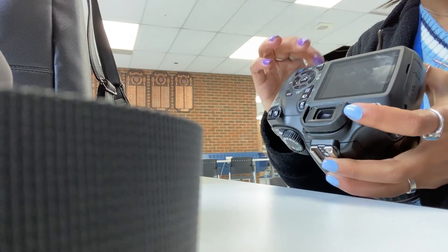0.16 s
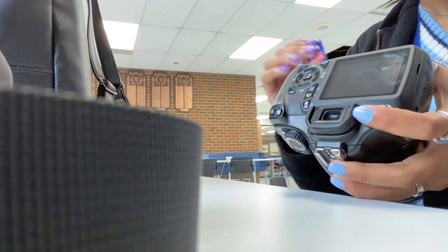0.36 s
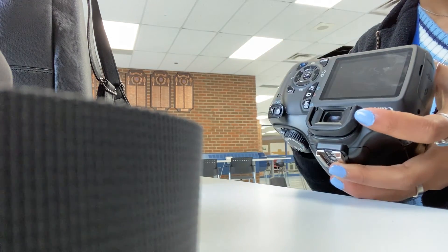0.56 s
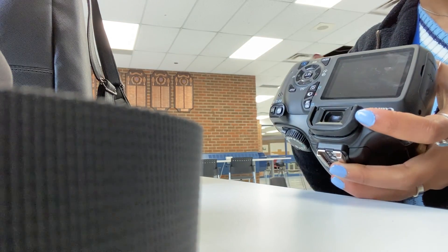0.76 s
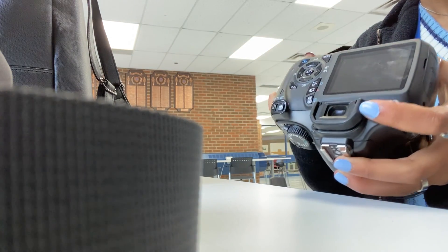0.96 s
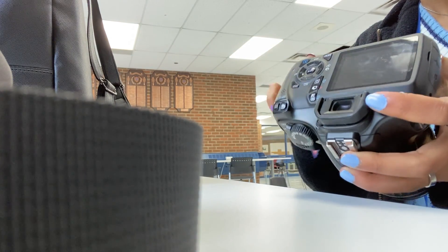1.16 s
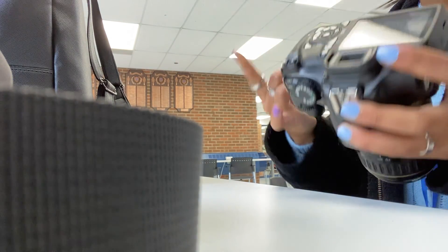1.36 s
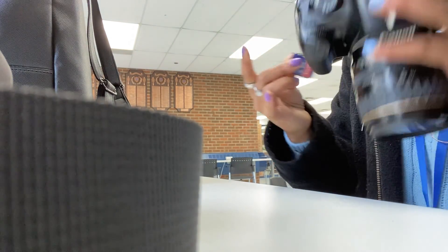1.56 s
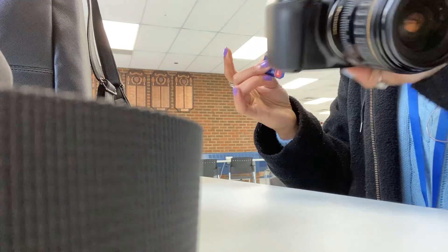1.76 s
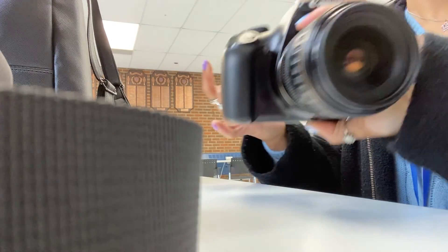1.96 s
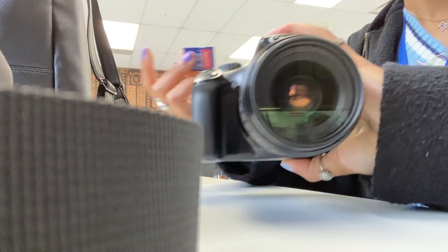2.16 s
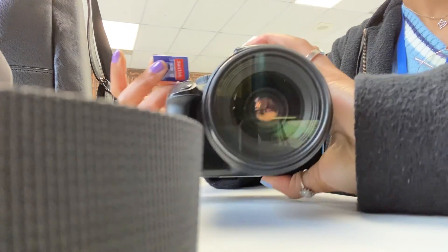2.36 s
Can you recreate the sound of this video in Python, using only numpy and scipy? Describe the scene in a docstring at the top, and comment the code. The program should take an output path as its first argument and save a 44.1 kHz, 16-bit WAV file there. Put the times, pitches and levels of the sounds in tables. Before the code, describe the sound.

Camera handling clicks: fingernail ticks and a short scrape, a button pressed and released, a cover snapped shut, then knocks and sleeve rustle as it is turned, close stereo microphone in a large humming room.

```python
"""A steady air-handling rumble fills a large room; fingernail ticks and a short scrape come over it.
Fingers at a table press a button of a plastic camera body, let it up, and snap a cover shut.
Then the camera is turned round, with knocks soft or sharp, a brush of sleeve and one dry tap.
Contacts excite decaying modes or noise bursts, rubbing is a train of random slips, the rumble is
filtered noise with tones, and decaying diffuse noise supplies the echoes of table and room."""
import sys
import numpy as np
from scipy import signal
from scipy.fft import rfft, irfft
from scipy.io import wavfile

SR = 44100
rng = np.random.default_rng(int(sys.argv[2]) if len(sys.argv) > 2 else 0)


def digitize_waveform(pressure):
    """Quantize a signal to 16-bit integers and store it at the path in sys.argv[1].

    Rows of a 2-D input are taken as channels; values are limited to [-1, 1].
    """
    field = np.atleast_2d(pressure).T
    bounded = np.clip(field, -1, 1)
    quanta = np.round(bounded * 32767).astype(np.int16)
    wavfile.write(sys.argv[1], SR, quanta)


N = 106942
T, HZ = np.arange(N) / SR, np.fft.rfftfreq(N, 1 / SR)  # time in s, frequency of each bin in Hz


def amp(db):
    """Level to gain: 20 dB is a factor of ten in amplitude."""
    return 10 ** (np.asarray(db) / 20)


def unit(x):
    """Normalisation to a root-mean-square of one."""
    return x / np.sqrt(np.mean(x ** 2) + 1e-20)


def decay(t, t60):
    """Exponential damping: the amplitude falls 60 dB in t60 seconds."""
    return np.exp(-np.log(1000) * t / t60)


def read(points, hz=HZ):
    """Interpolation of a spectrum along a logarithmic frequency axis."""
    f, value = np.transpose(points)
    return np.interp(np.log(hz + 1), np.log(f + 1), value)


def envelope(points):
    """Amplitude envelope: the level moves in straight lines in dB over time."""
    return amp(np.interp(T, *np.transpose(points), left=-120, right=-120))


def add(mix, s, sound):
    """Superposition: adds a sound to the mix at a time in seconds."""
    part = mix[round(s * SR):][:len(sound)]
    part += sound[:len(part)]


def colour(x, db):
    """Minimum-phase filtering: the Hilbert transform of log gain gives a causal phase."""
    log_gain = np.log(amp(np.maximum(db, -100)))
    mirrored = np.r_[log_gain, log_gain[-2:0:-1]]
    response = np.exp(signal.hilbert(mirrored).conj())
    return irfft(rfft(x) * response[:len(HZ)], N)


def burst(s, db, t60):
    """Random impulse excitation: a dying flurry of tiny contacts of either sign."""
    out, t = np.zeros(N), T[:SR // 10]
    signs = rng.choice([-1., 1.], len(t))
    add(out, s, signs * amp(db) * decay(t, t60))
    return out


def ring(contacts, modes):
    """Modal synthesis with dispersion: damped sines, the fast high bending waves arriving first."""
    longest_ring_s = .022  # the gripping hand damps the shell
    spread_s = 0.000712  # travel time of bending waves at 1 kHz
    out = np.zeros(N)
    for s, level in contacts:
        for k, (hz, db, t60) in enumerate(modes):
            travel = spread_s * np.sqrt(1000 / hz)
            sample_offset = round(s * SR) / SR - s  # keeps timing finer than a sample
            t = np.maximum(T[:SR // 10] + sample_offset - travel, 0)
            wave = decay(t, min(t60, longest_ring_s)) * np.sin(2 * np.pi * hz * t)
            add(out, s, (-1) ** k * amp(level + db) * wave)
    return out


def rub(level, shape, grain_db, grains_per_s):
    """Stick-slip friction: many small slips of uneven size at random times."""
    size = amp(grain_db * np.minimum(rng.exponential(1, N), 4))
    happens = rng.random(N) < grains_per_s / SR
    slips = rng.standard_normal(N) * size * happens
    return unit(colour(slips, shape)) * envelope(level)


# Left-right likeness of diffuse sound. Each row: frequency in Hz, coherence from 0 to 1.
LIKENESS = [(30, .99), (50, .94), (75, .6), (170, .5), (350, .4), (550, 0), (1500, .1), (5000, .2),
            (9000, .85), (14000, .95)]


def diffuse():
    """Spatial coherence: noise from all directions, as two close microphones get it."""
    a, b = rfft(rng.standard_normal((2, N)))
    same = np.clip(read(LIKENESS), -1, 1)
    return irfft(np.array([a, same * a + np.sqrt(1 - same ** 2) * b]), N)


# Spectrum of the moving air. Each row: frequency in Hz, relative density in dB per Hz.
AIR_COLOUR = [(20, -29), (31, -24), (44, -3), (66, -2), (92, -11), (125, -6), (190, -7), (300, -15),
              (540, -18), (680, -25), (820, -32), (1600, -46), (2500, -53), (3800, -62), (8000, -61),
              (12500, -61.5), (15000, -76)]
# Wavering fan tones. Each row: frequency in Hz, level in dB.
FAN_TONES = [(48.4, -50), (533, -68), (653, -74.5)]
# Swell and fade of the motor tone. Each row: time in seconds, level in dB.
MOTOR_LEVEL = [(0.1, -58), (0.42, -48), (0.85, -58), (1.1, -55), (2.05, -58.5), (2.28, -46.5)]


def ventilation():
    """Broadband flow noise plus periodic tones: air, wavering fans and a motor that comes and goes."""
    waver, waver_hz, motor_hz = 0.35, 4, 109.6  # waver: relative amplitude, and radians of phase
    sound = amp(-44) * unit(colour(diffuse(), read(AIR_COLOUR)))
    for hz, db in FAN_TONES:
        slow = np.exp(-(HZ / waver_hz) ** 2)
        swell, drift = unit(irfft(rfft(rng.standard_normal((2, N))) * slow, N))
        tone = (1 + waver * swell) * np.sin(2 * np.pi * hz * T + waver * drift)
        sound = sound + amp(db) * unit(tone)
    motor_level = amp(np.interp(T, *np.transpose(MOTOR_LEVEL)))
    return sound + motor_level * unit(np.sin(2 * np.pi * motor_hz * T))


# Fingernail ticks. Each row: start in seconds, level before colouring in dB, t60 in seconds.
NAIL_TICKS = [(0.0391, -22, 0.01), (0.0464, -26.5, 0.025), (0.1825, -14.5, 0.012), (0.187, -15.5, 0.012),
              (0.2012, -30, .008), (0.209, -25.5, 0.011), (0.2208, -29, 0.004), (0.287, -33, 0.016),
              (0.2927, -26, 0.0039), (0.403, -43.5, 0.0087), (0.4565, -45, .005), (0.482, -42, 0.0058),
              (1.1995, -46, 0.021), (1.215, -31.5, 0.012), (1.222, -33.5, 0.012), (1.2773, -44, 0.017),
              (1.3304, -37, 0.019), (2.03, -38, 0.0093), (2.3635, -34, 0.0099)]
# Their spectrum. Each row: frequency in Hz, gain in dB.
NAIL_COLOUR = [(500, -10.5), (2500, -36), (6000, -28.5), (8500, -28.5), (11000, -18.5), (13000, -9.5),
               (15000, -15.5), (16500, -21)]


def nails():
    """Impact of a light hard body: thin, bright ticks of fingernails on the shell."""
    return colour(sum(burst(*tick) for tick in NAIL_TICKS), read(NAIL_COLOUR))


# Course of the scrape. Each row: time in seconds, level in dB before the resonance gain.
SCRAPE_LEVEL = [(0.11, -92), (0.131, -60), (0.145, -63), (0.16, -62.5), (0.178, -57), (0.195, -62),
                (0.218, -65.5), (0.245, -102)]
# Its resonances. Each row: centre in Hz, offset at which the gain is 6 dB down in Hz, level in dB.
SCRAPE_RESONANCES = [(840, 160, -3), (1786, 410, -5.5), (3130, 535, -3.5), (4300, 460, -5.5),
                     (6820, 3500, -5.5), (12900, 1800, -8)]


def scrape():
    """Friction driving resonance: a nail drags over the shell, each resonance with its own slips."""
    out = np.zeros(N)
    for hz, width, db in SCRAPE_RESONANCES:
        shape = -20 * np.log10(1 + ((HZ - hz) / width) ** 2)
        out += amp(db) * rub(SCRAPE_LEVEL, shape, grain_db=3.5, grains_per_s=850)
    return out


# Catches of the dragging nail. Each row: start in seconds, level in dB, pitch in Hz.
NAIL_CATCHES = [(0.131, -52, 4350), (0.153, -50, 4320), (0.1585, -48, 3120), (0.1657, -48, 1920),
                (0.182, -39.5, 1590), (0.202, -51.5, 6630)]


def catches():
    """Plucked resonance: the dragging nail catches and lets go, sounding one mode each time."""
    t60 = .011
    return sum(ring([(s, db)], [(hz, 0, t60)]) for s, db, hz in NAIL_CATCHES)


# Knocks of fingers, soft and low or sharp and high.
# Each row: start in seconds, level in dB, centre in Hz, half width in octaves.
FINGER_KNOCKS = [(0.182, -16.5, 1430, 0.55), (0.1868, -22, 4500, 1), (0.8926, -40.5, 3400, 0.1),
                 (1.196, -39, 3600, 0.54), (1.2017, -19, 1440, 0.38), (1.551, -35.5, 2620, 0.37),
                 (1.5804, -15.5, 1780, 0.48), (1.828, -49, 4220, 0.8), (2.1155, -36.5, 2580, 0.61),
                 (2.206, -30, 1740, 0.75), (2.3646, -35.5, 8000, 0.26), (2.373, -20.5, 1194, 0.62)]


def knocks():
    """Band-limited impact: a blow and faint rattle excite one band of shell."""
    rattle_db, rattle_t60, skirt_db = -31, .01, 44  # skirt in dB per octave outside the band
    out = np.zeros(N)
    for s, db, hz, octaves in FINGER_KNOCKS:
        blow = burst(s, db + rattle_db, rattle_t60)
        add(blow, s, amp([db]))
        outside = np.maximum(abs(np.log2((HZ + 1) / hz)) - octaves, 0)
        out += colour(blow, -skirt_db * np.minimum(outside, 2))
    return out


# Contacts within each click. Each row: start in seconds, relative level in dB.
PRESS_CONTACTS = [(0.5477, -0.5), (0.5483, -14.5)]
RELEASE_CONTACTS = [(0.6433, -3), (0.6442, -11.5), (0.6454, 5)]
SNAP_CONTACTS = [(0.956, -16), (0.9578, 0.5), (0.9587, -24.5)]
# Modes of each struck part. Each row: frequency in Hz, relative level in dB, t60 in seconds before
# the hand's damping limit.
PRESS_PART = [(819, -33.5, 0.017), (1085, -31, 0.014), (1660, -37, 0.022), (2000, -37, 0.0033),
              (3045, -24, 0.0049), (3460, -28.5, 0.005), (4150, -31, 0.0061), (6040, -30, 0.009),
              (6680, -34.5, 0.006), (7700, -40, .007), (10000, -43.5, 0.0099), (11150, -36, 0.012),
              (14180, -36.5, 0.0027)]
RELEASE_PART = [(480, -36.5, 0.022), (675, -38, 0.015), (1170, -37.5, 0.026), (1370, -39, 0.018),
                (1740, -36, 0.0019), (2730, -33.5, 0.004), (3400, -33.5, 0.0037), (4200, -27, 0.0059),
                (5370, -38, 0.012), (6400, -32, 0.0015), (7970, -34.5, 0.0099), (9830, -28, 0.0043),
                (11300, -34.5, 0.0077), (13850, -30.5, 0.008)]
SNAP_PART = [(567, -21, 0.0047), (840, -27, 0.018), (1745, -29.5, 0.0143), (2740, -35, 0.007),
             (4006, -22.5, 0.0055), (4260, -22.5, 0.008), (5130, -28, 0.01), (6050, -26, 0.0024),
             (7340, -29.5, 0.0049), (8040, -27, 0.008), (10660, -25, 0.0039), (12430, -19.5, 0.0062),
             (13440, -20.5, 0.0067), (14700, -25, 0.0051)]


def click_ringing():
    """Modal response to impact: button down, button up and cover snap each ring their own part."""
    press = ring(PRESS_CONTACTS, PRESS_PART)
    release = ring(RELEASE_CONTACTS, RELEASE_PART)
    return press + release + ring(SNAP_CONTACTS, SNAP_PART)


def click(contacts, db, t60, tilt):
    """Repeated impact: each quick contact of a sprung part is followed by broad chatter."""
    flurry = sum(burst(s, level + db, t60) for s, level in contacts)
    return colour(flurry, tilt * np.log2(1 + HZ / 2000))  # tilt nears dB per octave well above 2 kHz


def chatter():
    """Incoherent radiation: the plastic rattle of all three clicks, drawn afresh for each direction."""
    press = click(PRESS_CONTACTS, db=-21, t60=0.0024, tilt=-2.3)
    release = click(RELEASE_CONTACTS, db=-32.5, t60=0.02, tilt=-2.6)
    return press + release + click(SNAP_CONTACTS, db=-35.5, t60=0.056, tilt=-0.48)


# The cover slides to its catch; the sleeve brushes, cloth swishes, then the sleeve's thin high swish.
# Each row of a level: time in seconds, level in dB. Each row of a colour: frequency in Hz, gain in dB.
SLIDE_LEVEL = [(0.944, -84.5), (0.95, -40), (0.956, -38.5), (0.959, -75)]
COVER_COLOUR = [(400, 3.5), (900, -3.5), (3000, -4), (6000, -22.5), (12000, -30)]
SLEEVE_LEVEL = [(1.47, -87.5), (1.53, -69), (1.61, -67), (1.7, -73), (1.8, -79), (1.95, -77), (2.2, -75)]
BRUSH_COLOUR = [(500, 7.5), (1400, 6), (2800, -2), (4300, -18), (16000, -26)]
SWISH_LEVEL = [(1.48, -92), (1.51, -77), (1.6, -77), (1.72, -89.5), (2.12, -99), (2.16, -76), (2.2, -91.5)]
CLOTH_COLOUR = [(4300, -19.5), (6000, -3), (7400, -1), (9000, -8), (11000, -11)]
SLEEVE_HISS_LEVEL = [(1.55, -89), (1.61, -74.5), (1.7, -75.5), (1.78, -85.5), (1.83, -93), (1.87, -85),
                     (1.92, -91.5)]
SLEEVE_HISS_COLOUR = [(3000, -17.5), (9500, -15.5), (12000, 0.5), (14500, 3.5), (16000, -20.5)]


def brushes():
    """Friction noise: dense slips of cover, sleeve and cloth, each layer with its own spectrum."""
    pairs = [(SLIDE_LEVEL, COVER_COLOUR), (SLEEVE_LEVEL, BRUSH_COLOUR),
             (SWISH_LEVEL, CLOTH_COLOUR), (SLEEVE_HISS_LEVEL, SLEEVE_HISS_COLOUR)]
    return sum(rub(level, read(spectrum), grain_db=-1.0, grains_per_s=9600) for level, spectrum in pairs)


# Contacts of the dry tap. Each row: start in seconds, relative level in dB.
TAP_CONTACTS = [(2.0298, -4), (2.0284, -16), (2.0329, -16.5)]
# What it rings. Each row: frequency in Hz, relative level in dB, t60 in seconds.
TAP_PART = [(1105, -35, 0.0062), (1730, -35.5, 0.0045), (2966, -27, 0.005), (3410, -27.5, 0.0036),
            (4800, -27, 0.0039)]


def tap():
    """Arrival-time difference: one dry tap from the right reaches the right microphone first."""
    lead_s = 0.0001
    left = ring([(s + lead_s, db) for s, db in TAP_CONTACTS], TAP_PART)
    return np.array([left, ring(TAP_CONTACTS, TAP_PART)])


def reflections(x, spectrum, t60s, onset_s):
    """Diffuse reverberation: a noise tail that builds up and dies at its own speed in each band."""
    hz, t, z = signal.stft(diffuse(), SR, nperseg=128)
    fade = decay(t, read(t60s, hz)[:, None])
    fade /= np.sqrt(np.mean(fade ** 2, axis=1, keepdims=True) * N)
    tail = signal.istft(z * fade, SR, nperseg=128)[1][:, :N]
    build_up = 1 - np.exp(-(T / onset_s) ** 2)
    tail = colour(tail * build_up, read(spectrum))
    return signal.fftconvolve(x[None], tail[:, :SR // 2], axes=1)[:, :N]


# Echoes: scatter off table and bag, nearby things, and the room.
# Each row of a colour: frequency in Hz, gain in dB. Each row of a decay: frequency in Hz, t60 in seconds.
TABLE_ECHO = [(300, -10.5), (650, -3.5), (1500, -1), (3500, -4), (5500, -1.5), (9000, 1), (14000, -16.5)]
TABLE_DECAY = [(500, 0.085), (3000, 0.017), (14000, 0.017)]
NEAR_ECHO = [(300, 0.5), (1200, -3.5), (3500, -6.5), (7000, -11), (14000, -13)]
NEAR_DECAY = [(500, 0.17), (3000, 0.12), (14000, .04)]
ROOM_ECHO = [(300, -0.5), (1200, -6.5), (3500, -15.5), (6500, -10.5), (10000, -14), (14000, -17)]
ROOM_DECAY = [(500, .35), (3000, .32), (7000, .32), (14000, .31)]


def scene():
    """Superposition of direct sound, echoes from table, nearby things and room, and ventilation."""
    ringing, finger_knocks, dry_tap = click_ringing(), knocks(), tap()
    fingers = nails() + scrape() + catches() + brushes()
    direct = amp(-1) * (ringing + chatter()) + fingers + finger_knocks
    # the hand shields the knocks from the room
    shared = amp(-9) * ringing + fingers + amp(-5) * finger_knocks + amp(-12) * dry_tap[1]
    spills = [shared + amp(3) * chatter() for wall in range(3)]
    table = reflections(direct, TABLE_ECHO, TABLE_DECAY, onset_s=0.00025)
    near = reflections(spills[0], NEAR_ECHO, NEAR_DECAY, onset_s=0.0045)
    room = sum(reflections(spill, ROOM_ECHO, ROOM_DECAY, onset_s=0.0069) for spill in spills)
    room = room / np.sqrt(len(spills))
    return direct + dry_tap + table + near + room + ventilation()


# Port balance. Each row: frequency in Hz, left minus right in dB.
PORT_BALANCE = [(40, -1), (150, .4), (700, 2), (2000, 1), (5500, 3.5), (8500, 0), (15000, 0)]
# Port phase. Each row: frequency in Hz, lead of the left in radians.
PORT_LEAD = [(20, 0), (6000, 0), (8200, -1.1), (10200, -3.1), (11500, -4.7), (13000, -6.1), (15500, -9)]


def record(dry):
    """Two-port transfer: level and treble phase differ; then come soft ends and a band limit."""
    fade_s, cut_hz = .008, 16300
    side = amp(read(PORT_BALANCE) / 2)
    right = np.exp(-1j * read(PORT_LEAD)) / side
    ports = irfft(rfft(dry) * np.array([side, right]), N)
    ports = ports * np.minimum(np.minimum(T, T[::-1]) / fade_s, 1)
    low_pass = signal.firwin(255, cut_hz, window=("kaiser", 9), fs=SR)
    return signal.oaconvolve(ports, low_pass[None], "same")


dry = scene()
out = record(dry)
digitize_waveform(out)
```